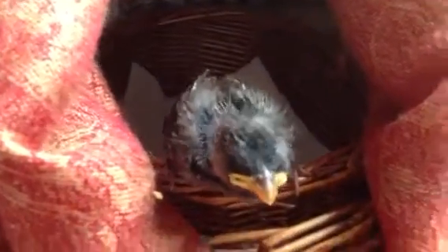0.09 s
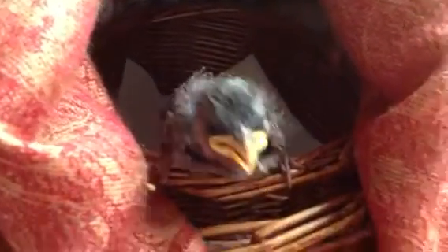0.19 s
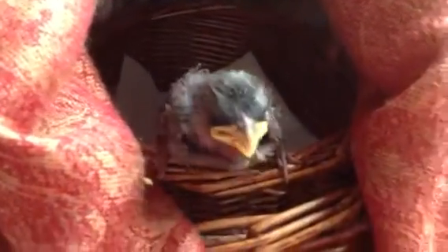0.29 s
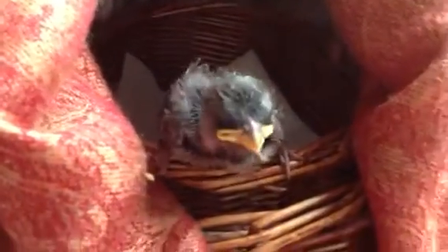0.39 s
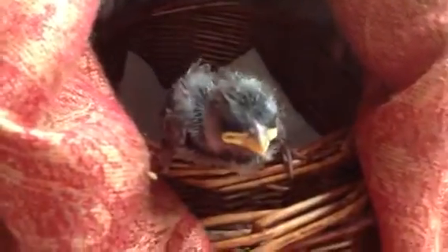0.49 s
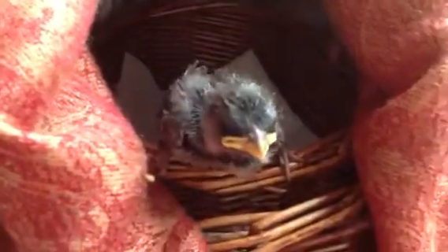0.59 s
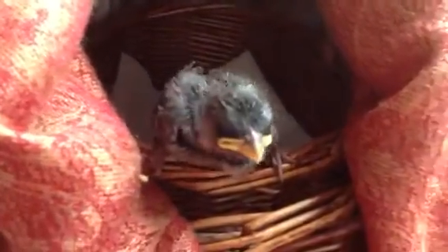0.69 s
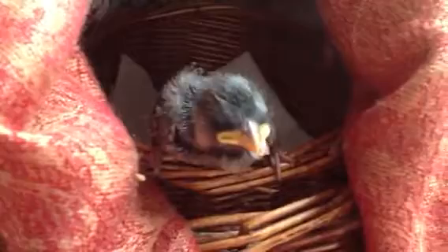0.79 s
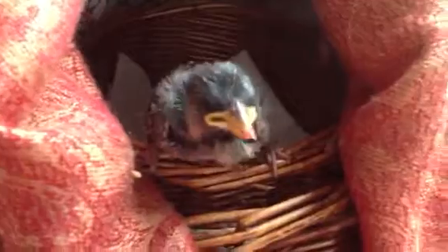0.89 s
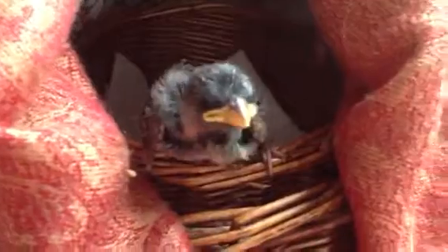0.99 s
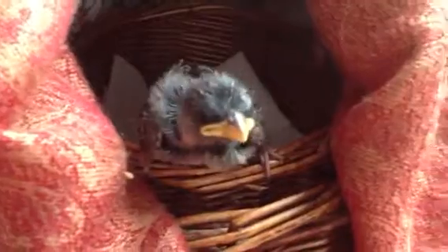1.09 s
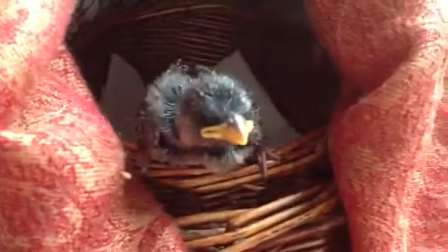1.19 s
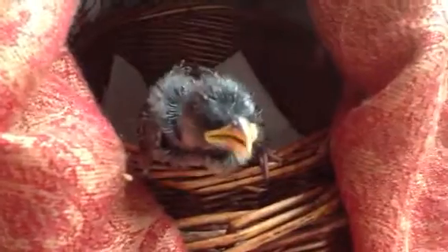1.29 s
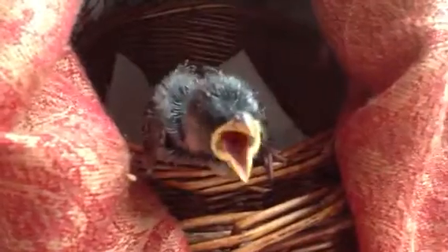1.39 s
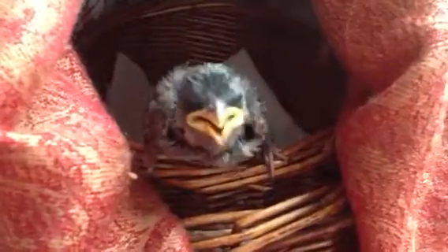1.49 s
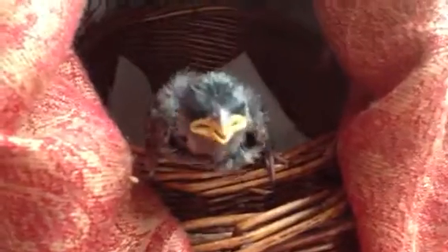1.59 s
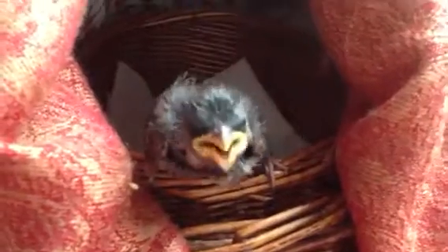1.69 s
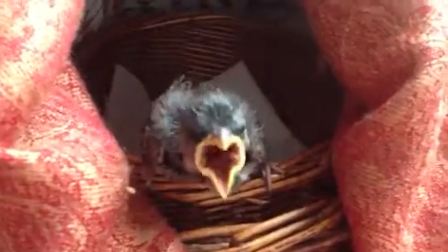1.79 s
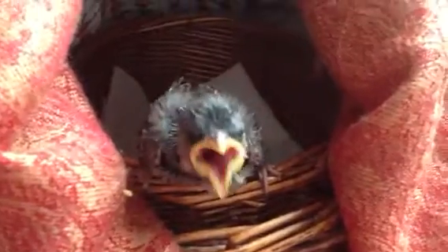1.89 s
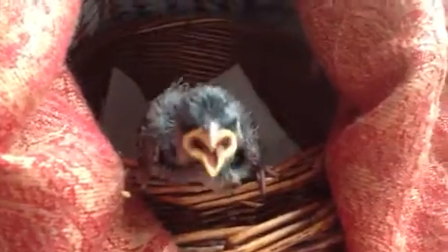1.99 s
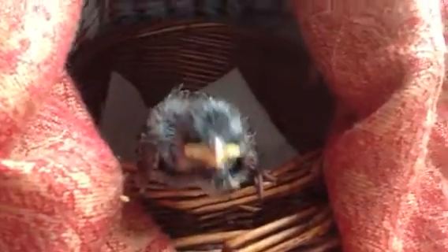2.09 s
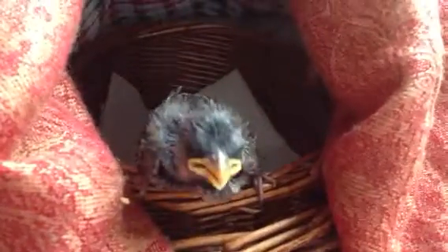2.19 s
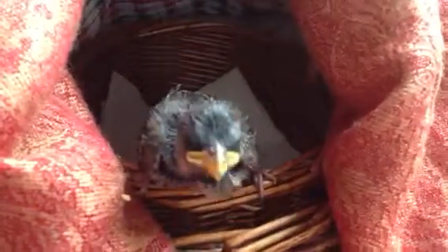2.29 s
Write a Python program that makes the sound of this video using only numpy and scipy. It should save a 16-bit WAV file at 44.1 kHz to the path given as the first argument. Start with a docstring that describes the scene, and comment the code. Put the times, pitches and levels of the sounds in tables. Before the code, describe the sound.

A baby bird close to the microphone gives two piercing begging calls about a second apart, each starting raspy, with a high arched whistle then a lower rising one, in a quiet room with a short echo.

```python
"""A sparrow chick in a wicker basket begs twice, close by, in a quiet room.
Each call starts with tiny gliding pips and a hoarse rasp of shaped noise and shaky tones.
It breaks into two whistles, a high arch and a lower upward slur with a flutter, made from sine waves.
Decaying noise makes the echoes. Faint beak clicks, puffs, taps and far whistles sit in a soft hush."""
import sys
import numpy as np
from scipy import signal
from scipy.fft import rfft, irfft
from scipy.io import wavfile

SR = 44100
rng = np.random.default_rng(int(sys.argv[2]) if len(sys.argv) > 2 else 0)


def store_pcm(level_fs):
    """Save levels as 16-bit WAV."""
    pcm = np.round(np.clip(level_fs, -1, 1) * 32767).astype(np.int16)
    wavfile.write(sys.argv[1], SR, np.atleast_2d(pcm).T)


N = 101430
T = np.arange(N) / SR  # time of every sample, in s


def from_db(db):
    """Turn decibels into a gain, where 20 dB is ten times the amplitude."""
    return 10 ** (np.asarray(db) / 20)


def rms_one(x):
    """Scale a signal so that its average power is 1."""
    return x / np.sqrt(np.mean(x ** 2) + 1e-20)


def filtered(x, order, cut_hz, kind="low"):
    """Keep only the low, high or middle part of a sound."""
    return signal.sosfilt(signal.butter(order, cut_hz, kind, fs=SR, output="sos"), x)


def coloured(x, spectrum):
    """Make each frequency louder or softer, along a curve drawn on a logarithmic frequency scale."""
    hz, db = np.transpose(spectrum)
    f = np.maximum(np.fft.rfftfreq(len(x), 1 / SR), 1)
    gain = from_db(np.interp(np.log(f), np.log(hz), db))
    return irfft(rfft(x) * gain, len(x))


def noise(spectrum):
    """Random hiss with the given tone colour, scaled to power 1."""
    return rms_one(coloured(rng.standard_normal(N), spectrum))


def drift(hz):
    """Random wandering around zero: smoothed noise, up to about the given rate, with spread 1."""
    wander = filtered(rng.standard_normal(N + SR), 2, hz)
    return rms_one(wander[SR:])  # drop the first second, while the filter settles


def gate(start, end, fade_s):
    """Open between start and end, with straight fades inside."""
    return np.clip(np.minimum(T - start, end - T) / fade_s, 0, 1)


def bumps(events, width_s):
    """Short, smooth bell-shaped swells at the listed times and levels."""
    return sum(from_db(db) * np.exp(-((T - s) / width_s) ** 2) for s, db in events)


def phase_of(hz):
    """Add up a changing pitch to get the running phase of its wave."""
    return 2 * np.pi * np.cumsum(hz) / SR


# extra tones at 0.5, 1.5 and 2.5 times the pitch, when the note is high: level/dB
HALF_PARTIALS_DB = [-40.5, -32, -28.5]
DOUBLING_ABOVE_HZ = 4850
JITTER, WEAK_JITTER = 0.0017, 0.043  # pitch wobble as a share of the pitch: always, and added when weak
CLEAN_ABOVE_DB, SHIMMER_DB = -15.5, 1.13
OVERTONE_FLICKER_DB, OVERTONE_PHASE_NOISE_RAD = 3, .4
BEAK_CUT_HZ = 14500


def note(curve, partials):
    """A whistle is steady when loud and shaky when weak; high up, its wave repeats only every second cycle."""
    s, pitch, level = np.transpose(curve)
    hz, db = np.interp(T, s, pitch), np.interp(T, s, level)
    weak = np.clip((CLEAN_ABOVE_DB - db) / 10, 0, 1)
    phase = phase_of(hz * (1 + (JITTER + WEAK_JITTER * weak) * drift(370)))

    def overtone(multiple, partial_db):
        """A ragged overtone wanders in both loudness and phase."""
        loudness = from_db(partial_db + OVERTONE_FLICKER_DB * drift(140))
        return loudness * np.sin(multiple * phase + OVERTONE_PHASE_NOISE_RAD * drift(560))

    upper = sum(overtone(k + 2, partial_db) for k, partial_db in enumerate(partials[1:]))
    halves = sum(overtone(k + .5, partial_db) for k, partial_db in enumerate(HALF_PARTIALS_DB))
    doubled = np.clip((hz - DOUBLING_ABOVE_HZ) / 200, 0, 1)
    overtones = filtered(upper + doubled * halves, 4, BEAK_CUT_HZ)
    fundamental = from_db(partials[0]) * np.sin(phase)
    loudness = from_db(db + SHIMMER_DB * drift(250)) * gate(s[0], s[-1], .003)
    return np.sqrt(2) * loudness * (fundamental + overtones)


# the high note of each call, before its overtones: t/s, f/Hz, level/dB
ARCHES = [
    [(.214, 3850, -36), (.224, 3980, -22), (.227, 4060, -13), (.235, 4280, -9), (.239, 4750, -18),
     (.243, 5200, -12), (.252, 5430, -6.5), (.268, 5170, -8), (.276, 5020, -8), (.279, 4600, -13),
     (.288, 4050, -11), (.293, 3750, -26)],
    [(1.470, 3450, -42), (1.495, 3950, -23), (1.505, 4280, -20), (1.510, 4680, -15), (1.518, 5100, -12),
     (1.528, 5230, -7), (1.538, 5100, -9), (1.548, 5280, -9), (1.552, 4780, -8), (1.560, 4200, -10),
     (1.567, 3750, -26)],
]
# harmonics 1 to 4 of the arch, relative to the note: level/dB
ARCH_PARTIALS = [0, -22, -22.5, -44]
# moments when the voice changes register and the note nearly stops: t/s
BREAKS = [.278, 1.5413, 1.550]
BREAK_S, BREAK_DEPTH = .0008, .9


def arches():
    """The high notes dip for an instant wherever the voice changes register."""
    breaks = sum(np.exp(-((T - s) / BREAK_S) ** 2) for s in BREAKS)
    return sum(note(curve, ARCH_PARTIALS) for curve in ARCHES) * (1 - BREAK_DEPTH * breaks)


# the lower, upward note of each call, before its overtones: t/s, f/Hz, level/dB
SLURS = [
    [(.333, 2350, -45), (.350, 3105, -29.5), (.360, 3442, -19.5), (.367, 3716, -13), (.378, 4400, -9.5),
     (.386, 4520, -9), (.391, 4200, -18.5), (.396, 3500, -27.5), (.408, 2780, -33), (.428, 2850, -44.5)],
    [(1.620, 3063, -43.5), (1.634, 3444, -21.5), (1.642, 3727, -13), (1.651, 4250, -12.5),
     (1.657, 4520, -14.5), (1.667, 4333, -12.5), (1.672, 3886, -22), (1.682, 3600, -23)],
]
# harmonics 1 to 4 of the slur, relative to the note: level/dB
SLUR_PARTIALS = [0.5, -28, -22, -36.5]
# when the flutter of each slur starts: t/s
SLUR_FLUTTERS_FROM = [.380, 1.653]
FLUTTER_HZ, FLUTTER_DEPTH = 330, .8  # the rate is an average


def slurs():
    """Near its top, each slur is chopped by a fast, slightly uneven rise and fall in loudness."""
    out = np.zeros(N)
    for curve, start in zip(SLURS, SLUR_FLUTTERS_FROM):
        rate = FLUTTER_HZ * (1 + .15 * drift(153)) * (T > start)
        closing = np.sin(phase_of(rate) / 2) ** 2
        out += note(curve, SLUR_PARTIALS) * (1 - FLUTTER_DEPTH * closing ** 2)
    return out


# the hoarse part of each call: t/s, level/dB of the throaty rasp, level/dB of the bright hiss
RASPS = [
    [(.152, -57.5, -58), (.172, -34.5, -41), (.194, -21.5, -32.5), (.222, -21.5, -27), (.230, -38.5, -28.5),
     (.240, -30, -29.5), (.250, -38.5, -47.5), (.272, -43, -42), (.286, -36, -32.5), (.294, -18.5, -30),
     (.328, -23.5, -45.5), (.350, -22, -31), (.360, -29, -32.5), (.374, -42, -51.5), (.382, -29.5, -32),
     (.397, -19.5, -34.5), (.416, -34, -50.5), (.445, -49, -70)],
    [(1.433, -63, -53), (1.461, -48, -27.5), (1.485, -28, -20), (1.504, -34, -23), (1.514, -45.5, -25),
     (1.530, -43.5, -41.5), (1.558, -38.5, -38), (1.567, -20.5, -29), (1.605, -26, -46),
     (1.630, -20.5, -33), (1.638, -37, -40.5), (1.649, -37.5, -39.5), (1.656, -24.5, -32),
     (1.682, -25, -42.5), (1.700, -37, -58), (1.730, -52, -80)],
]
# tone colour of the throaty rasp: f/Hz, relative level/dB
THROAT = [(100, -69.5), (500, -48), (1000, -34), (1600, -27.5), (2100, -26.5), (2650, -13), (3100, -13),
          (3900, -1.5), (4700, 3), (5600, -7), (6400, -17.5), (8500, -31), (11500, -29.5), (15500, -23.5)]
# tone colour of the bright hiss: f/Hz, relative level/dB
HISS = [(100, -68), (700, -41.5), (1100, -30.5), (1500, -20.5), (2150, -26.5), (2750, -17), (3600, -10),
        (5000, -7.5), (6200, -0.5), (7300, 1), (8400, -1.5), (9800, -5), (11800, -2), (13500, -6),
        (15500, -12)]
RASP_FLICKER_HZ, RASP_FADE_S, RASP_LOW_CUT_HZ = 257, .012, 900
RASP_FLICKER_DB, HISS_FLICKER_DB = 1, -3.3  # opposite signs: one gets louder as the other gets softer


def rasps():
    """The voice vibrates chaotically in uneven bursts, ringing the throat and hissing through the open beak."""
    out = np.zeros(N)
    for curve in RASPS:
        s, throat_db, hiss_db = np.transpose(curve)
        bursts = drift(RASP_FLICKER_HZ)
        throat = rms_one(noise(THROAT) * from_db(RASP_FLICKER_DB * bursts))
        hiss = rms_one(noise(HISS) * from_db(HISS_FLICKER_DB * bursts))
        throat = throat * from_db(np.interp(T, s, throat_db))
        hiss = hiss * from_db(np.interp(T, s, hiss_db))
        out += (throat + hiss) * gate(s[0], s[-1], RASP_FADE_S)
    return filtered(out, 3, RASP_LOW_CUT_HZ, "high")


# hoarse, half-formed tones that glide inside the rasp: t/s, centre f/Hz, level/dB
STRANDS = [
    [(.176, 5950, -27), (.194, 6450, -25.5), (.212, 6400, -22.5), (.228, 6000, -21)],
    [(.290, 5800, -20), (.300, 5650, -20.5), (.320, 5150, -24), (.338, 4950, -24), (.352, 5900, -28),
     (.366, 7350, -39.5)],
    [(1.450, 8900, -39), (1.476, 8300, -26.5), (1.486, 7350, -20), (1.504, 6950, -20), (1.513, 7400, -23.5)],
    [(1.565, 5100, -31), (1.573, 5600, -26), (1.590, 5300, -29.5), (1.610, 4950, -31), (1.626, 5650, -23),
     (1.642, 7400, -45)],
]
STRAND_WANDER_HZ, STRAND_LOW_CUT_HZ = 320, 2500
STRAND_OCTAVE_DB, STRAND_EVENNESS = -15.5, .35  # evenness 1 would remove all random swings in level


def strands():
    """Random swings in phase and level blur each gliding tone and its octave into a hoarse band."""
    out = np.zeros(N)
    for curve in STRANDS:
        s, pitch, level = np.transpose(curve)
        chaos = drift(STRAND_WANDER_HZ) + 1j * drift(STRAND_WANDER_HZ)
        phase = phase_of(np.interp(T, s, pitch)) + np.angle(chaos)
        wave = np.sin(phase) + from_db(STRAND_OCTAVE_DB) * np.sin(2 * phase)
        tone = np.abs(chaos) ** (1 - STRAND_EVENNESS) * wave
        out += rms_one(tone) * from_db(np.interp(T, s, level)) * gate(s[0], s[-1], .003)
    return filtered(out, 4, STRAND_LOW_CUT_HZ, "high")


# pips as the voice starts and catches:
# t/s, length/s, start f/Hz, end f/Hz, level/dB, pitch wobble (share of f)
PIPS = [(.152, 0.013, 5726, 6200, -36, 0.024), (1.4357, 0.0083, 5780, 6380, -43, .015),
        (1.44, 0.011, 6250, 6400, -45.5, 0.013)]
PIP_OCTAVE_DB = -25.5


def pips():
    """As the voice catches, a thin, shaky tone and its faint octave glide from one pitch to another."""
    out = np.zeros(N)
    for start, length, from_hz, to_hz, db, unsteady in PIPS:
        hz = np.interp(T, [start, start + length], [from_hz, to_hz])
        phase = phase_of(hz * (1 + unsteady * drift(400)))
        wave = np.sin(phase) + from_db(PIP_OCTAVE_DB) * np.sin(2 * phase)
        out += np.sqrt(2) * from_db(db) * gate(start, start + length, .002) * wave
    return out


# the beak opening and closing: t/s, level/dB
BEAK_CLICKS = [(1.406, -54), (1.4307, -52), (1.822, -58)]
# tone colour of the clicks: f/Hz, relative level/dB
BEAK_CLICK = [(2000, -26.5), (5000, -7), (8000, -1), (11000, -4), (14000, -6)]
BEAK_CLICK_S = .0007


def beak_clicks():
    """The beak ticks faintly as it parts and shuts: very short swells of bright noise."""
    return noise(BEAK_CLICK) * bumps(BEAK_CLICKS, BEAK_CLICK_S)


# faint puffs at the peak of each arch: t/s, level/dB
PUFFS = [(.254, -53.5), (1.53, -68.5)]
# tone colour of the puffs: f/Hz, relative level/dB
PUFF = [(20, -6.5), (60, 0), (150, -3.5), (400, -12), (750, -8.5), (1300, -28.5)]
PUFF_WIDTH_S = 0.0037


def puffs():
    """A short swell of low noise makes a soft bump under the peak of each call."""
    return noise(PUFF) * bumps(PUFFS, PUFF_WIDTH_S)


# soft taps as the chick shifts: t/s, starting level/dB
TAPS = [(1.947, -60), (1.961, -57)]
TAP_BAND_HZ, TAP_T60_S = (450, 1200), 0.031  # T60 is the time to fall by 60 dB


def taps():
    """The chick shifts with dull knocks: low-to-middle noise that starts at once and dies quickly."""
    envelope = sum(from_db(db - 60 * np.abs(T - s) / TAP_T60_S) * (T >= s) for s, db in TAPS)
    return envelope * rms_one(filtered(rng.standard_normal(N), 3, TAP_BAND_HZ, "band"))


def reflections(x, t60_s, delay_s):
    """Many dense echoes start after a delay and die away; together they have energy 1."""
    response = rng.standard_normal(N) * from_db(-60 * T / t60_s) * (T > delay_s)
    return signal.fftconvolve(x, response / np.linalg.norm(response))[:N]


# tone colour of all the echoes: f/Hz, gain level/dB
ROOM_COLOUR = [(500, -16), (2000, -1.5), (3000, 5.5), (3500, -1.5), (4000, -5), (4450, -4), (4800, -2.5),
               (5300, -7), (7000, -9), (15000, -11)]
NEAR_DB, NEAR_T60_S, NEAR_DELAY_S = -24.5, .06, 0.00094
ROOM_DB, ROOM_T60_S, ROOM_DELAY_S = -20.5, 0.34, .008


def echoes(chick):
    """Things close by send back quick echoes, and the room adds a longer tail."""
    near = from_db(NEAR_DB) * reflections(chick, NEAR_T60_S, NEAR_DELAY_S)
    room = from_db(ROOM_DB) * reflections(chick, ROOM_T60_S, ROOM_DELAY_S)
    return coloured(near + room, ROOM_COLOUR)


# thin whistles far away:
# t/s, length/s, start f/Hz, end f/Hz, average level/dB inside the fades, pitch wobble (share of f)
FAR_WHISTLES = [(0.596, 0.38, 1879, 1990, -78, .008), (1.251, 0.092, 3590, 3400, -71.5, .05),
                (1.299, 0.092, 3130, 2750, -70, .05), (1.949, 0.035, 6500, 6600, -61, 0.043),
                (1.975, 0.23, 6570, 6310, -76, 0.022), (2.185, 0.067, 5200, 5150, -63, .004)]


def far_whistles():
    """Random changes in pitch and loudness blur thin tones that lie barely above the hush."""
    out = np.zeros(N)
    for start, length, from_hz, to_hz, db, unsteady in FAR_WHISTLES:
        hz = np.interp(T, [start, start + length], [from_hz, to_hz])
        tone = np.sin(phase_of(hz * (1 + unsteady * drift(250))))
        out += np.sqrt(2) * from_db(db) * gate(start, start + length, length / 3) * drift(85) * tone
    return out


# tone colour of the quiet room: f/Hz, relative level/dB
FLOOR = [(25, -44.5), (60, -25.5), (100, -9), (150, -1), (250, 0), (350, -6.5), (600, -8), (1500, -12),
         (4000, -14), (10000, -16), (15500, -17.5)]
FLOOR_DB = -65


def hush():
    """The quiet room is a steady, mostly low noise."""
    return from_db(FLOOR_DB) * noise(FLOOR)


def scene():
    """Only the chick's voice and beak clicks get echoes; the other sounds are added as they are."""
    chick = arches() + slurs() + rasps() + strands() + pips() + beak_clicks()
    return (chick + puffs() + taps() + echoes(chick) + far_whistles() + hush())[None]


CUTOFF_HZ = 15400


def record(dry):
    """A steep filter removes the very highest treble."""
    return signal.sosfilt(signal.ellip(12, .1, 90, CUTOFF_HZ, fs=SR, output="sos"), dry)


dry = scene()
out = record(dry)
store_pcm(out)
```